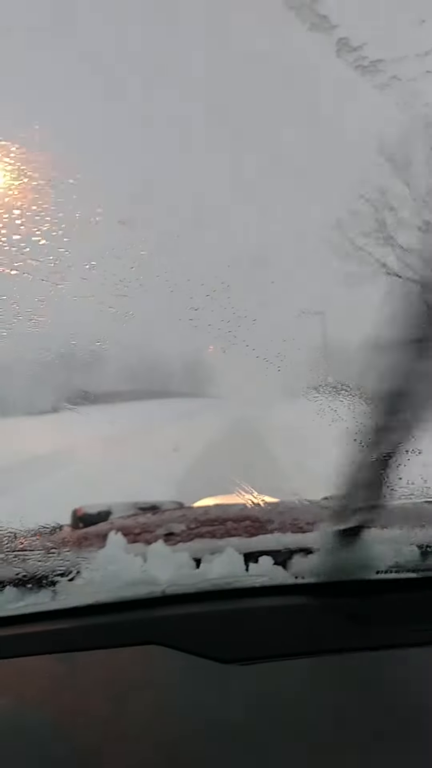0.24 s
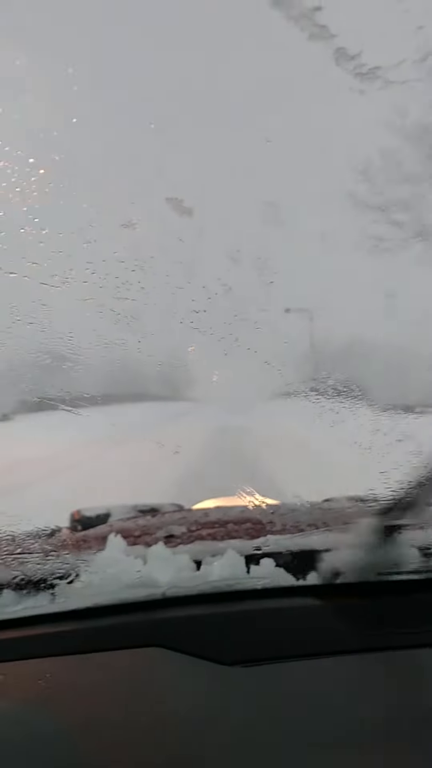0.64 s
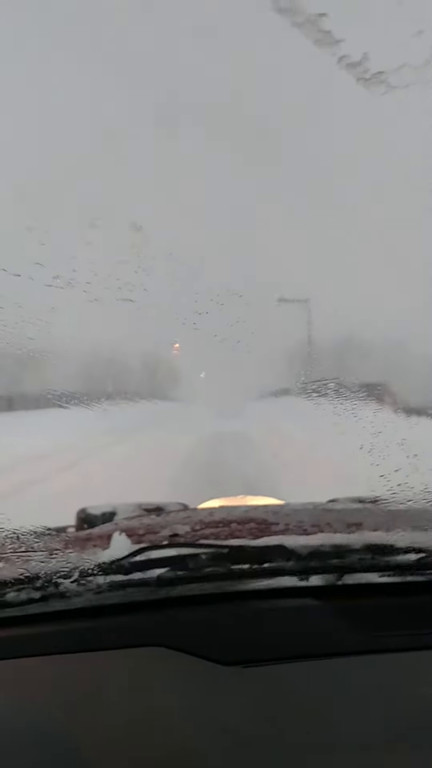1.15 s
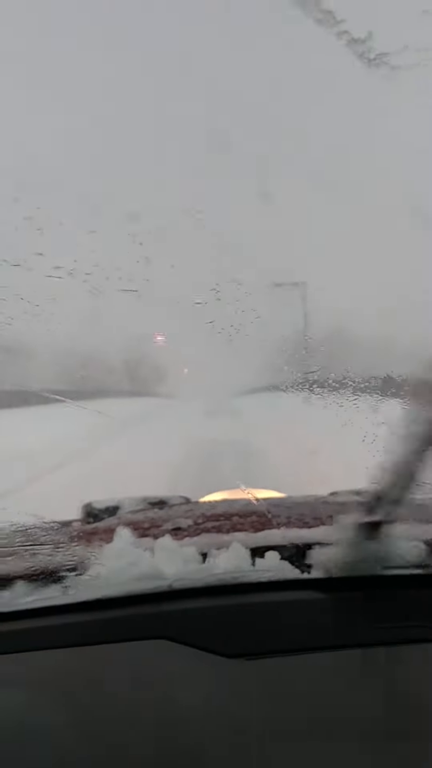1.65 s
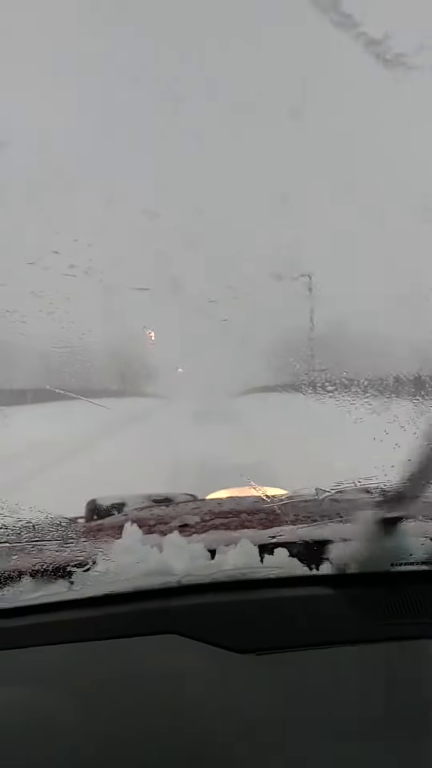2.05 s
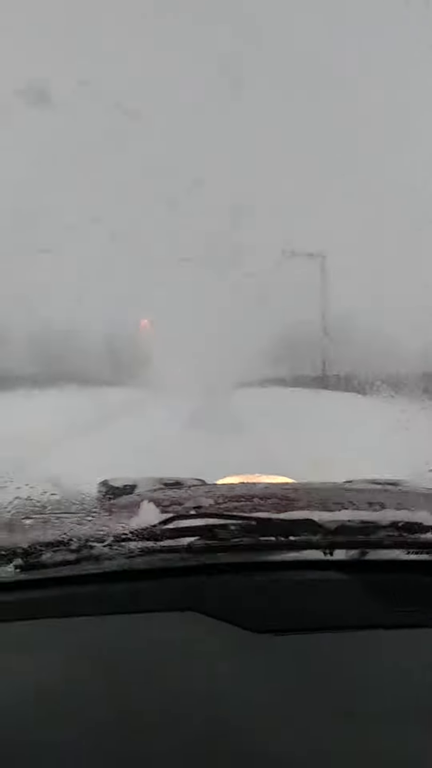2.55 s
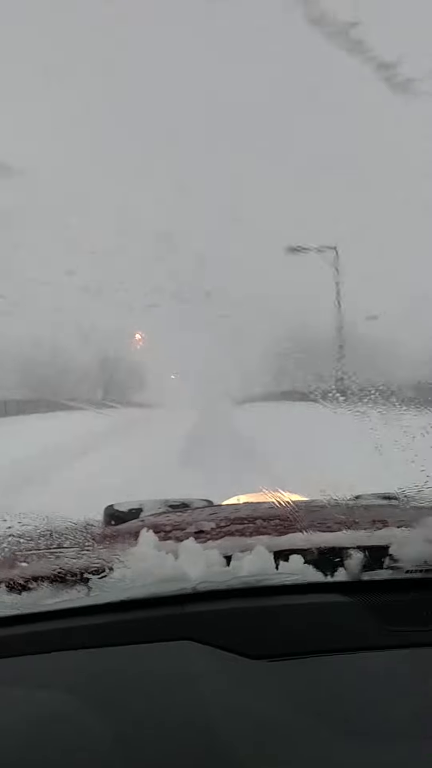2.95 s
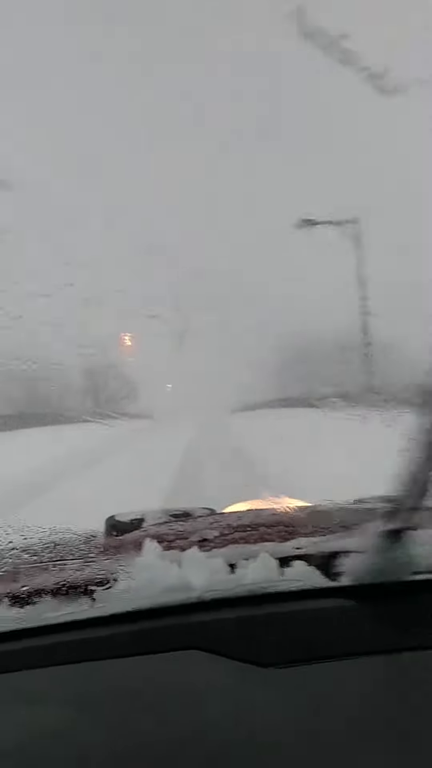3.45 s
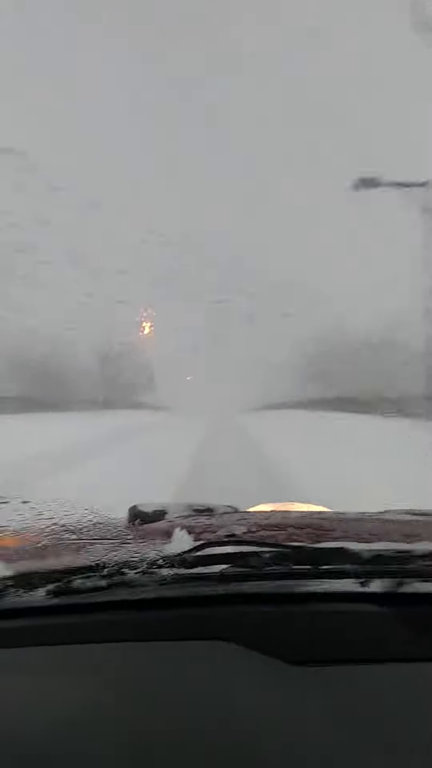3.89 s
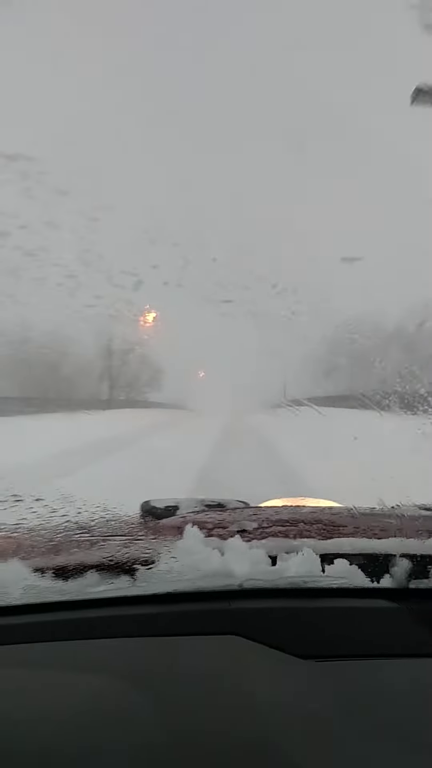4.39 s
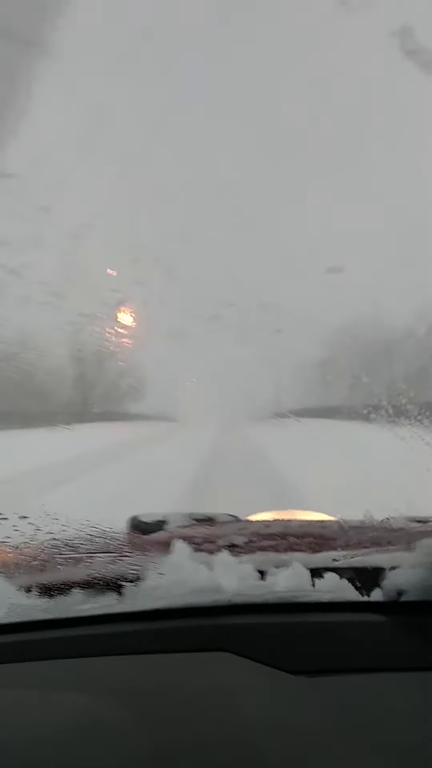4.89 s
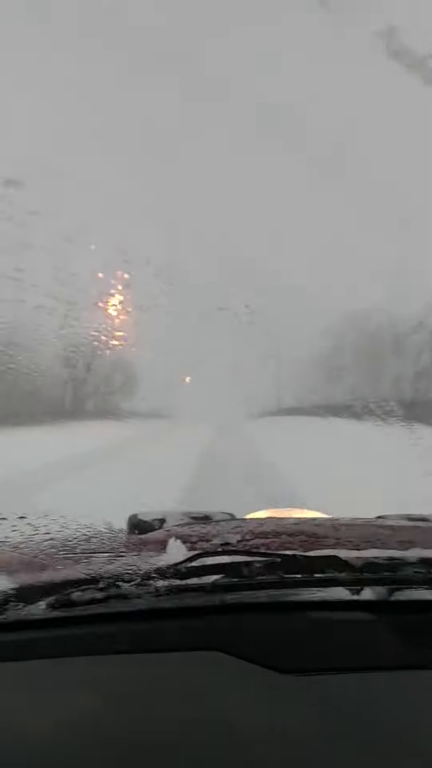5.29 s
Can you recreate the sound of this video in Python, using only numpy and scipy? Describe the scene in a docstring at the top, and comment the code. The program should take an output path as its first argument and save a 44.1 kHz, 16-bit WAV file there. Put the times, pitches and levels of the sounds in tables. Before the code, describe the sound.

Inside a vehicle cab on a snowy road, a steady low engine hum and tyre drone sit over body rumble and a rush of heater air. Snow-laden wipers knock four times, about every 1.4 seconds, each followed by a faint wet swish. Small scuffs, ticks and dull clicks fall between; one soft jolt past the middle makes the level dip briefly. Close microphone at the dashboard.

```python
"""Creeping along a snowy road

Inside a vehicle, engine orders (sines locked to crank angle) rise slowly in pitch and sink a little at the end.
Coloured noise gives the tyre drone, body rumble and defroster air; one soft pulse jolts the cab.
Snow-laden wipers knock at the top of each sweep as damped sines; grains ringing the glass swish, scuff and tick.
Now and then the level drops abruptly with a dull click and creeps back, over a steady thin hiss."""
import sys
import numpy as np
from scipy import signal
from scipy.fft import rfft, irfft
from scipy.io import wavfile

SR = 44100
rng = np.random.default_rng(int(sys.argv[2]) if len(sys.argv) > 2 else 0)


def pcm_store(signal):
    """Save signal as 16-bit PCM."""
    levels = np.round(np.clip(np.atleast_2d(signal), -1, 1) * 32767)
    wavfile.write(sys.argv[1], SR, levels.astype(np.int16).T)


N = 243873
TIME = np.arange(N) / SR
FREQS = np.maximum(np.arange(N // 2 + 1) * SR / N, 1)

# wiper arms reversing: start_s, thud_db (before slack and mode levels), clatter_db, swish_db
REVERSALS = [(0.418, -19, -41.5, -55), (1.841, -27, -41.5, -56.5), (3.263, -22.5, -41.5, -53.5),
             (4.686, -23, -40, -52)]
# resonances of blade and glass: centre_hz, width_hz, relative_level_db
BLADE_MODES = [(875, 410, 2), (1400, 450, 2), (2080, 340, -5), (2850, 275, -4), (3480, 480, -10.5),
               (5750, 3100, -26.5)]


def from_db(db):
    """Logarithmic level: 20 dB is a factor of ten in amplitude."""
    return 10 ** (np.asarray(db) / 20)


def rms_one(x):
    """Normalisation to unit mean power."""
    return x / np.sqrt(np.mean(x ** 2) + 1e-20)


def in_time(rows):
    """Linear interpolation: each column of a curve at every sample."""
    start_s, *columns = np.transpose(rows)
    return [np.interp(TIME, start_s, column) for column in columns]


def lowpass(x, cutoff_hz):
    """Second-order low-pass filtering dulls a sound."""
    return signal.sosfilt(signal.butter(2, min(cutoff_hz, .45 * SR), fs=SR, output="sos"), x)


def drift(rate_hz):
    """Low-pass random fluctuation of rms 1."""
    spectrum = rfft(rng.standard_normal(N))
    return rms_one(irfft(spectrum / (1 + (FREQS / rate_hz) ** 2) ** 2, N))


def peak_lift(hz, centre_hz, width_hz, lift_db):
    """Resonance curve: the lift in dB halves at half the width from the centre."""
    return lift_db / (1 + (2 * (hz - centre_hz) / width_hz) ** 2)


def noise(spectrum, resonances=()):
    """Spectral shaping of random noise: a broad colour lifted at each resonance, rms 1."""
    hz, db = np.transpose(spectrum)
    colour_db = np.interp(np.log(FREQS), np.log(hz), db)
    # beyond the last point the level falls 60 dB per decade
    colour_db = colour_db - 60 * np.log10(np.maximum(FREQS / hz[-1], 1))
    for centre_hz, width_hz, lift_db in resonances:
        colour_db = colour_db + peak_lift(FREQS, centre_hz, width_hz, lift_db)
    return rms_one(irfft(rfft(rng.standard_normal(N)) * from_db(colour_db), N))


def ring(force, hz, t60_s):
    """Impulse response of a damped oscillator: a unit click starts a sine of initial height 1."""
    r = 1000 ** (-1 / (t60_s * SR))
    w = 2 * np.pi * hz / SR
    return signal.lfilter([0, np.sin(w)], [1, -2 * r * np.cos(w), r * r], force + 1e-18)


def clicks(times_s, db):
    """Impulsive excitation: one single-sample force at each time."""
    out = np.zeros(N)
    out[np.round(times_s * SR).astype(int)] = from_db(db)
    return out


def resonate(force, modes):
    """Modal superposition: damped resonances side by side, with alternating signs."""
    out = 0
    for k, (hz, width_hz, db) in enumerate(modes):
        r = np.exp(-np.pi * width_hz / SR)
        poles = [1, -2 * r * np.cos(2 * np.pi * hz / SR), r * r]
        unit_peak = signal.lfilter([1, 0, -1], poles, force) * (1 - r * r) / 2
        out = out + (-1) ** k * from_db(db) * unit_peak
    return out


def contacts(events, modes, rise_s, soft_hz, grain_db=3.5):
    """Granular friction: clusters of tiny contacts build up, die away and excite the modes."""
    pressure = 0
    for peak_s, db, fall_s in events:
        decay = np.maximum((peak_s - TIME) / rise_s, (TIME - peak_s) / fall_s)
        pressure = pressure + from_db(db) * np.exp(-np.minimum(decay, 20))
    grains = rng.standard_normal(N) * from_db(grain_db * drift(600))
    grains = lowpass(grains, soft_hz)  # rubber and snow soften the blow
    return resonate(pressure * grains, modes) / np.std(resonate(grains, modes))


def engine(waver_db=2.0, wobble=0.00704):
    """Harmonic orders of rotation: four cylinders fire twice a turn, shafts add orders, all waver at random."""
    # crank speed and order levels: start_s, turns_per_s, firing_db, other_orders_db (before boom and waver)
    crank = [(0, 36.6, -45, -33), (1.1, 36.8, -39.5, -34.5), (2.1, 38.1, -38.5, -33.5),
             (2.6, 38.1, -35, -33.5), (3.6, 38, -33.5, -33.5), (4.5, 41.1, -33.5, -32),
             (5.2, 40.9, -33.5, -35.5), (5.53, 39.7, -37, -42)]
    # other engine and drive line orders, below and above the firing hum:
    # multiple_of_crank_speed, relative_level_db
    side_orders = [(1.68, -7.5), (3, -8), (3.65, -7.5), (4, 0.5), (5.9, -10), (11, -18.5)]
    # a panel of the cab booms when an order passes through it: centre_hz, width_hz, lift_db
    panel = (414, 36, 10.1)

    speed, firing_db, orders_db = in_time(crank)
    angle = 2 * np.pi * np.cumsum(speed * (1 + wobble * drift(4.88))) / SR
    orders = [(2, firing_db)] + [(multiple, orders_db + db) for multiple, db in side_orders]
    out = 0
    for multiple, db in orders:
        boom_db = peak_lift(multiple * speed, *panel)
        phase = 2 * np.pi * rng.random()
        gain = from_db(db + boom_db + waver_db * drift(15))
        out = out + gain * np.sin(multiple * angle + phase)
    return out


def tyres(drone_db=-2.0, swell_db=0.42, swell_hz=12):
    """Amplitude-modulated noise: the drone follows the snow load and swells slightly at random, above rumble."""
    # load on the tyres in uneven snow: start_s, drone_db (before the overall drone_db)
    snow = [(0, -26.5), (.85, -26.5), (1.05, -28.5), (1.28, -25), (2.25, -28.5), (2.45, -27), (3.35, -27.5),
            (3.68, -24.5), (3.88, -29), (4.15, -30.5), (4.58, -26), (5.53, -28.5)]
    # body shaking, on the whole harder as the vehicle gets going: start_s, rumble_db
    shaking = [(0, -42), (1.1, -36), (2.2, -33), (3.1, -34), (3.95, -32), (4.7, -36.5)]
    # tyre drone colour: frequency_hz, relative_density_db
    drone_colour = [(90, -15.5), (125, -5.5), (190, 0), (250, -1), (310, -2.5), (385, -10), (480, -15.5),
                    (620, -40), (900, -40.5)]
    # body rumble colour: frequency_hz, relative_density_db
    rumble_colour = [(8, -8.5), (15, 7), (35, -4), (55, -1.5), (100, -5.5), (200, -13.5), (400, -23),
                     (800, -43.5)]

    load_db, = in_time(snow)
    rumble_db, = in_time(shaking)
    random_db = swell_db * drift(swell_hz)
    drone = from_db(load_db + drone_db + random_db) * noise(drone_colour)
    return drone + from_db(rumble_db) * noise(rumble_colour)


def defroster(air_db=-41.5):
    """Turbulent flow noise: a steady rush of air, its spectrum lifted at resonances, with a faint whine."""
    # blown air colour: frequency_hz, relative_density_db
    air_colour = [(200, -6.5), (460, 6.5), (620, 3), (840, -6), (1150, -3), (1420, -11.5), (2000, -13),
                  (2350, -19), (3400, -20), (4000, -25), (5500, -31.5), (7500, -39), (11000, -47),
                  (15500, -53.5)]
    # resonances in the air noise, with a faint whine near 9.6 kHz, perhaps the wiper motor:
    # centre_hz, width_hz, lift_db
    air_peaks = [(416.3, 37.4, 9.5), (1080, 40, 3.5), (1286, 90, 3.5), (1676, 57, 4), (2110, 140, 5.5),
                 (2630, 99, 6), (2857, 180, 3.5), (3480, 90, 2.5), (3626, 50, 6.5), (9630, 240, 5.5)]
    return from_db(air_db) * noise(air_colour, air_peaks)


def swish(lag_s=.06, rise_s=.2, fall_s=0.44):
    """Sliding friction: rubber hisses over wet glass, peaking just after each reversal, then fading."""
    strokes = [(s + lag_s, db, fall_s) for s, _, _, db in REVERSALS]
    return contacts(strokes, BLADE_MODES, rise_s=rise_s, soft_hz=5000, grain_db=1.9)


def wipers(spread_db=2.5, jitter_s=0.00036, clatter_s=0.017):
    """Impact excitation: at reversal the arm thuds through linkage slack and the blade flops on the glass."""
    # contacts of one knock through the linkage slack: offset_s, relative_level_db
    slack = [(-0.0062, -6.5), (0, -0.5), (0.0095, -4)]
    # arm and cowl: frequency_hz, relative_level_db, t60_s
    arm_modes = [(139, -2, 0.051), (480, -3, 0.052), (595, -6.5, 0.057), (710, -11.5, 0.038)]

    # every reversal paired with every contact: time and level add
    blows = (np.array(REVERSALS)[:, None, :2] + np.array(slack)).reshape(-1, 2)
    times_s = blows[:, 0] + jitter_s * rng.standard_normal(len(blows))
    thud = 0
    for k, (hz, db, t60_s) in enumerate(arm_modes):
        strength_db = blows[:, 1] + db + spread_db * rng.standard_normal(len(blows))
        thud = thud + (-1) ** k * ring(clicks(times_s, strength_db), hz, t60_s)
    flops = [(s, db, clatter_s) for s, _, db, _ in REVERSALS]
    return thud + contacts(flops, BLADE_MODES, rise_s=0.0025, soft_hz=6000)


def blades():
    """Brief contact excitation: rubber scuffs over wet snow and bits of ice tick on the glass."""
    # ice ticking on the glass: start_s, level_db, fall_s
    ice_ticks = [(0.57, -54.5, 0.0055), (1.834, -61, .005), (1.999, -60, 0.0064), (3.744, -60, .006),
                 (4.190, -58, 0.0042)]
    # ice on glass: centre_hz, width_hz, relative_level_db
    ice_modes = [(3400, 470, 1), (5300, 1000, -3), (6700, 1000, -5.5)]
    # blades scuffing over wet snow: start_s, level_db, fall_s
    snow_scuffs = [(1.268, -50, .008), (1.292, -46.5, .014), (1.824, -40, 0.0021), (2.517, -43, 0.0083),
                   (2.606, -42, 0.013), (3.738, -46, .008), (3.748, -41, .0025)]

    scuffing = contacts(snow_scuffs, BLADE_MODES, rise_s=0.0014, soft_hz=6000)
    ticking = contacts(ice_ticks, ice_modes, rise_s=.001, soft_hz=7500)
    return scuffing + ticking


def jolt():
    """Pressure transient: one Gaussian pulse through the cab as the body jolts over a rut."""
    # the pulse: centre_s, height, half_length_s (to 1/e of the height)
    rut = (3.7612, .18, .0012)
    centre_s, height, half_length_s = rut
    return height * np.exp(-((TIME - centre_s) / half_length_s) ** 2)


def scene():
    """Linear superposition of all sources, as heard from behind the dashboard."""
    return (engine() + tyres() + defroster() + swish() + wipers() + blades() + jolt())[None]


def record(dry, step_s=.0001, click_s=.0003, click_hz=3000, hiss_db=-76.0,
           recovery_db_per_s=9, cutoff_hz=15500):
    """Gain modulation: the level drops with a dull click and creeps back, over hiss; the top is cut."""
    # sudden drops of the level: start_s, depth_db, click_db (before dulling)
    drops = [(1.535, 2.5, -29), (1.87, 2.0, -57), (2.03, 3, -55), (2.6217, 1.1, -32), (3.51, 2.5, -37),
             (3.7646, 2, -28), (3.7655, 5, -28)]

    remaining_db = [(TIME >= s) * np.maximum(depth_db - recovery_db_per_s * (TIME - s), 0)
                    for s, depth_db, _ in drops]
    drop_db = np.max(remaining_db, axis=0)  # the deepest drop prevails
    r = np.exp(-1 / (step_s * SR))
    drop_db = signal.lfilter([1 - r], [1, -r], drop_db)  # each drop takes a few samples

    snaps = 0
    for s, _, db in drops:
        snaps = snaps + from_db(db) * (TIME >= s) * np.exp(-np.minimum(abs(TIME - s) / click_s, 20))
    hiss = from_db(hiss_db) * rng.standard_normal(N)
    out = dry * from_db(-drop_db) + lowpass(snaps, click_hz) + hiss
    soft_ends = np.minimum(np.minimum(TIME, TIME[::-1]) / .002, 1)  # 2 ms fades
    top_cut = signal.ellip(12, .1, 80, cutoff_hz, fs=SR, output="sos")
    return signal.sosfilt(top_cut, out * soft_ends)


dry = scene()
out = record(dry)
pcm_store(out)
```